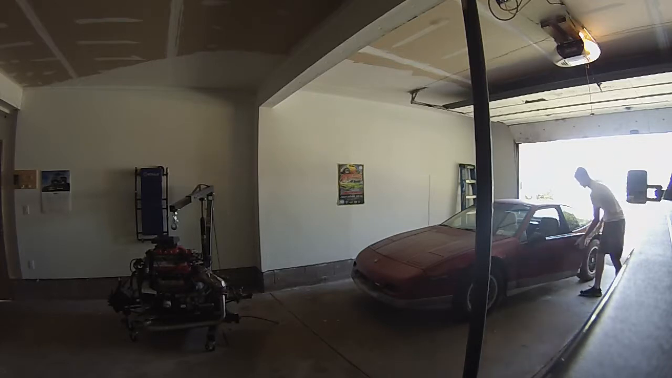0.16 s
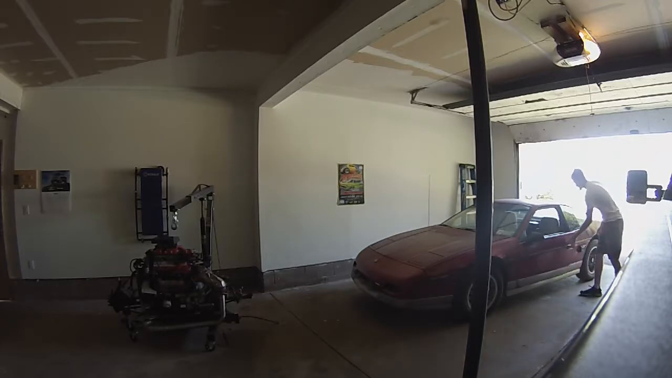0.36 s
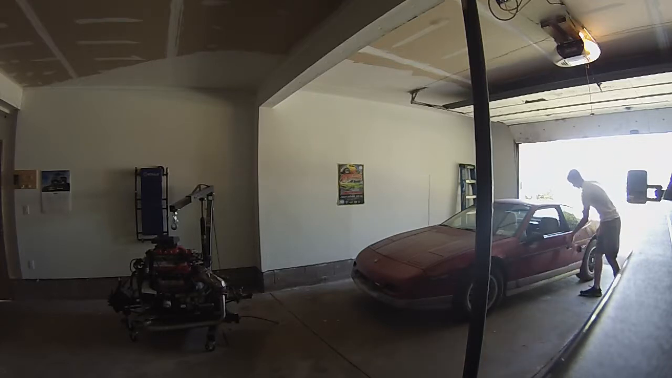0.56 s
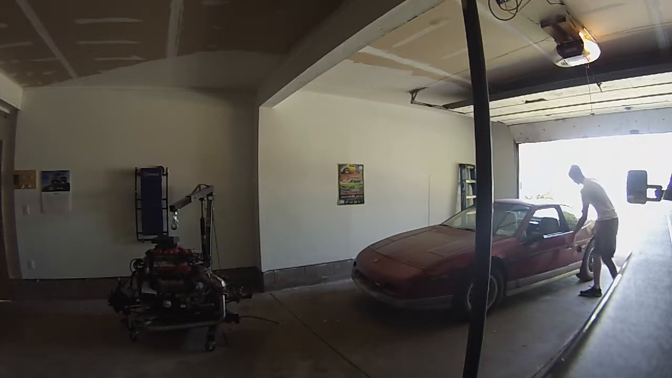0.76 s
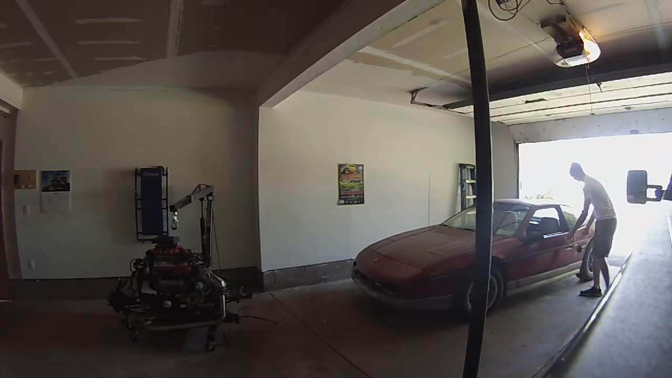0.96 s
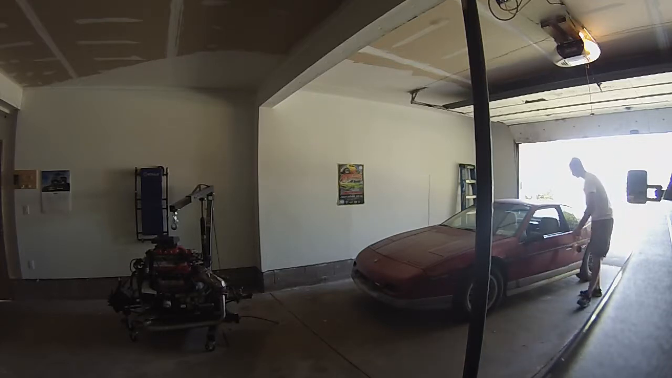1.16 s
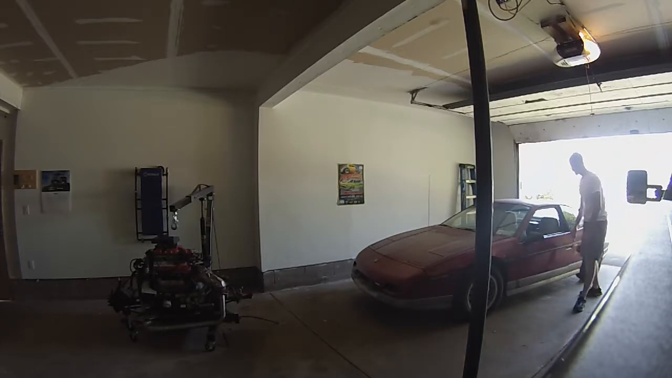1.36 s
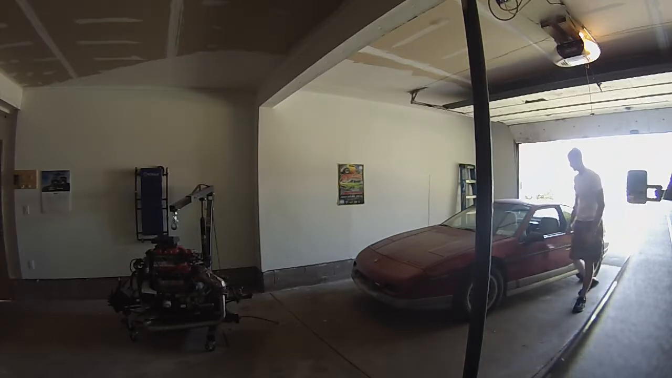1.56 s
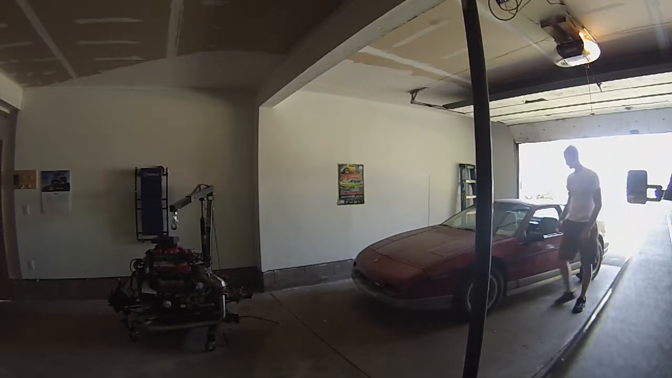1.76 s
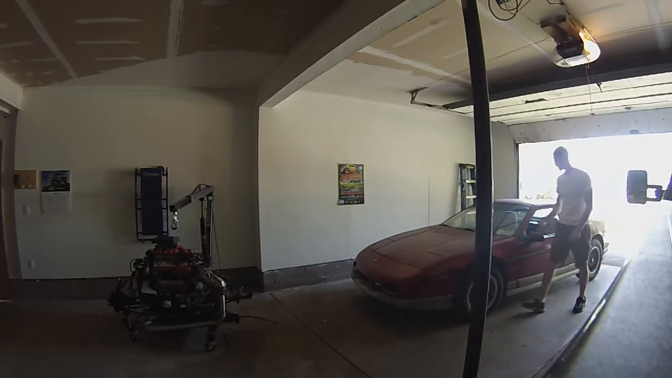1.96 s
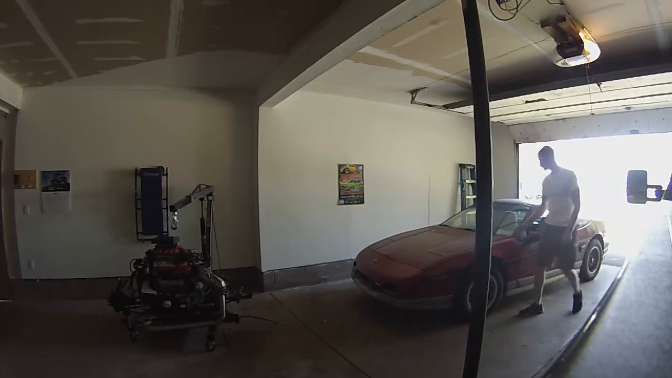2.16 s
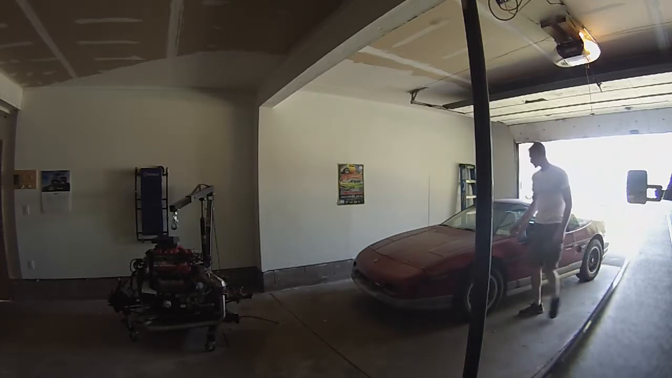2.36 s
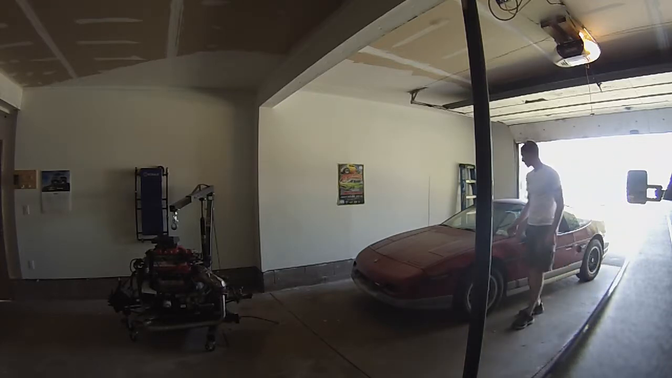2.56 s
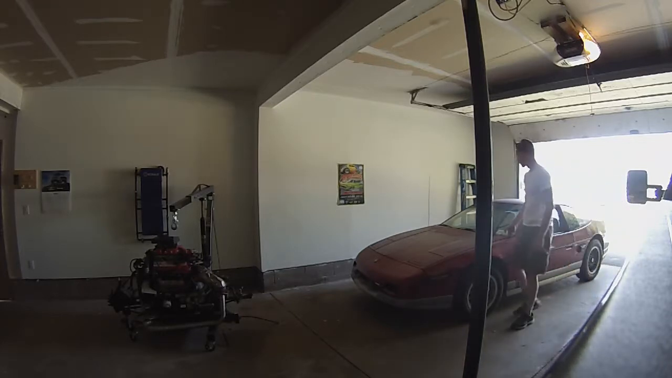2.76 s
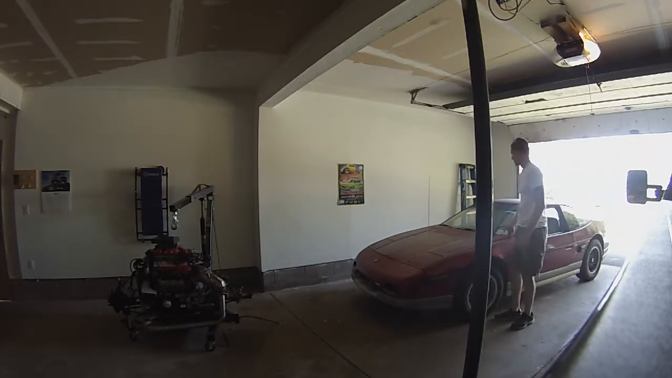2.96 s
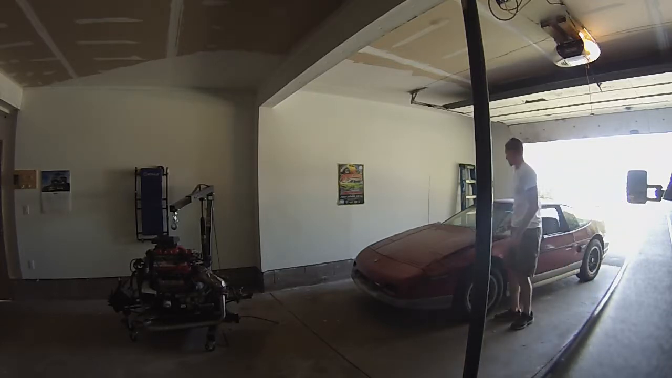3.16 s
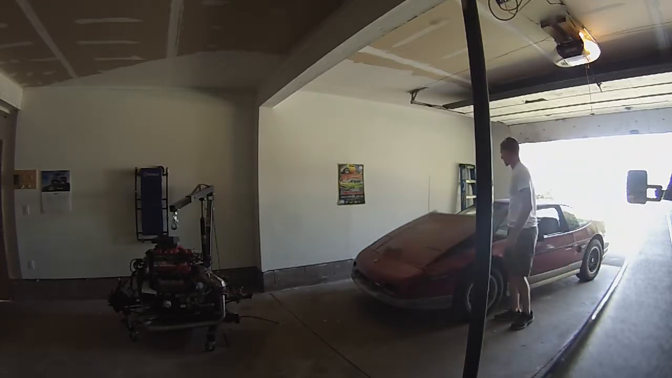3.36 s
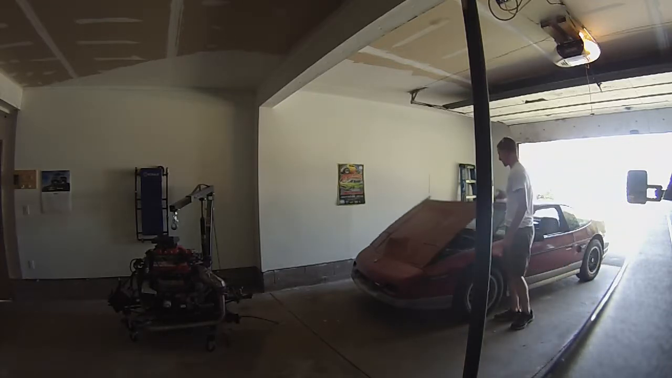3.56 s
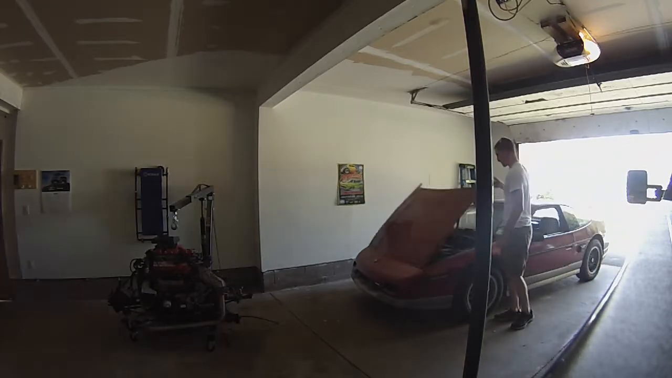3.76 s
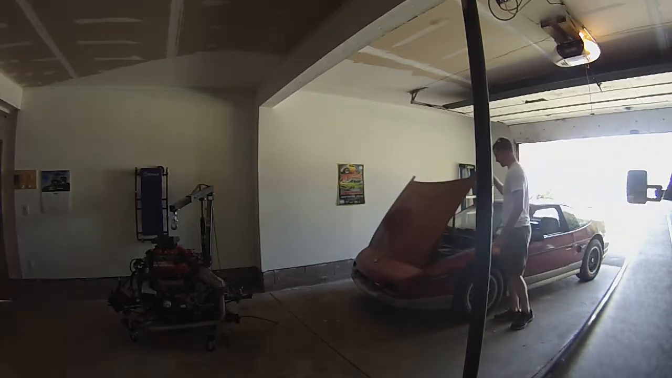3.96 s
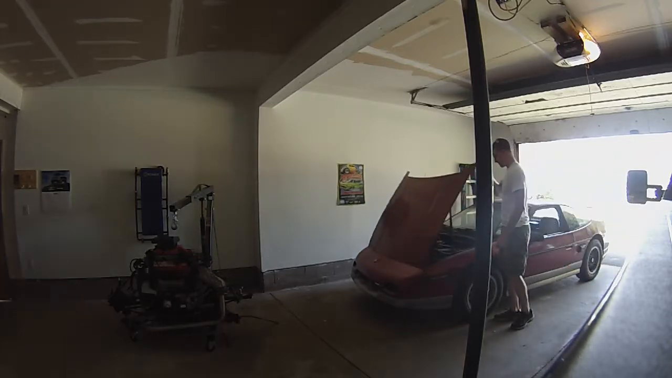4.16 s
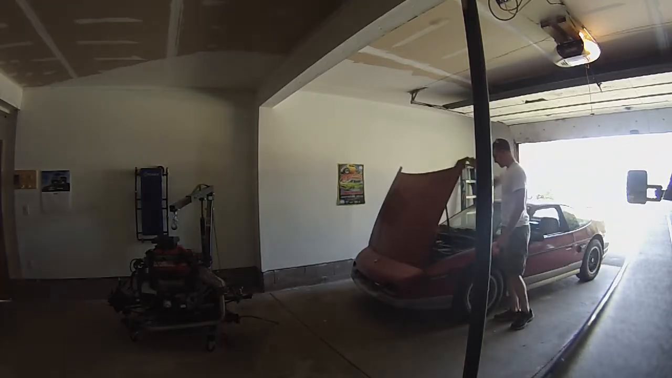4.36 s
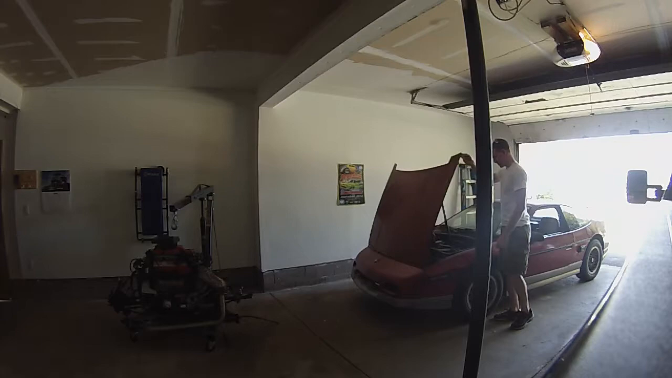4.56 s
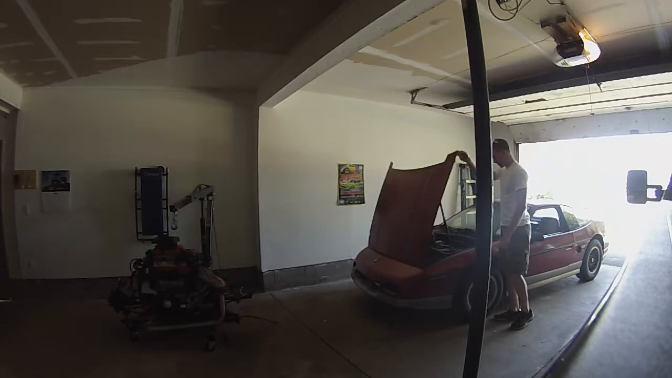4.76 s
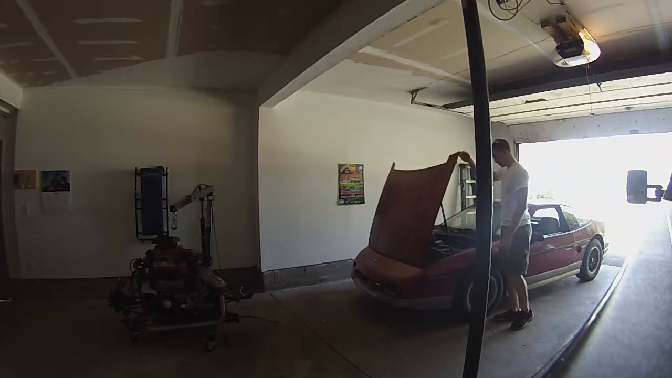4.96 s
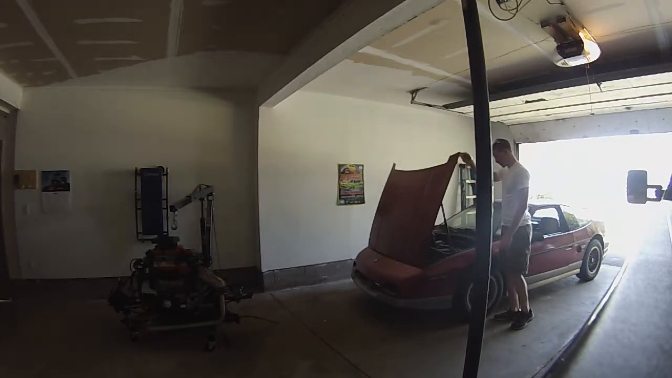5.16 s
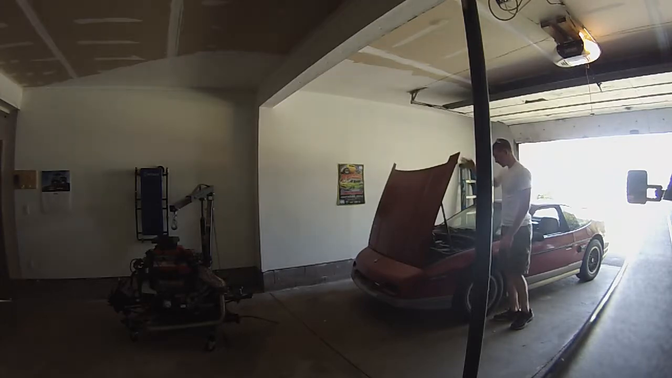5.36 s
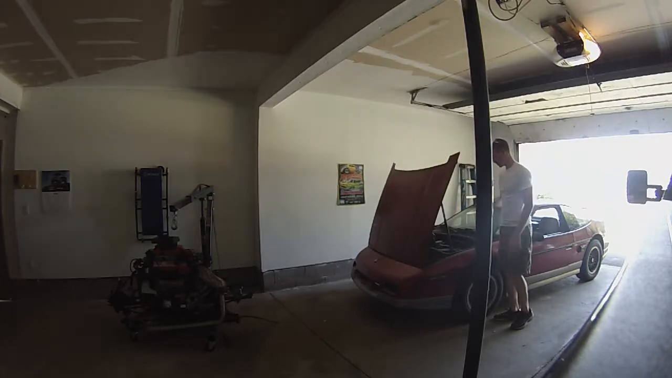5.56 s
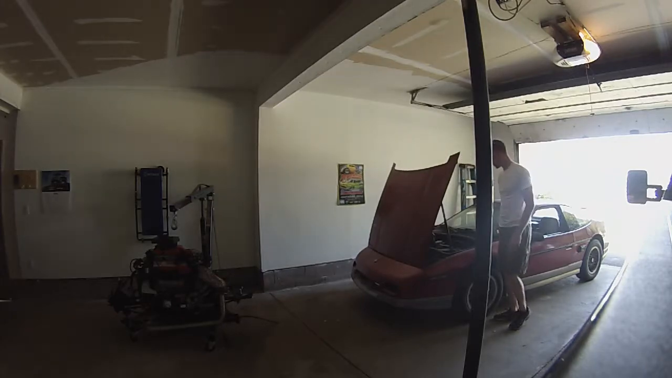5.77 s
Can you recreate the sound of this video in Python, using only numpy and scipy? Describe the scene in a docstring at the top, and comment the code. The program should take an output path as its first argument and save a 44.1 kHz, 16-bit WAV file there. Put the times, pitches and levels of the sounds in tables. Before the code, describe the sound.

A distant, nearly mono pickup in an echoing garage over quiet steady air with thin whines. A hinge knock and click lead to a solid car door slam with brief rattle. Quiet gritty steps follow under a passing low hum, then a loud hood pop. The prop slides and groans softly, ratchets past two bright metallic notches, and the panel settles with dull knocks.

```python
"""A car door knocks on its hinge in a bare, echoing garage, over steady air with thin whines, and is pushed
shut. A low outdoor hum swells once, shoes scuff on concrete, and the hood pops off its latch and is lifted. Its
stay slides and groans, clicks over two notches and takes the weight; small ticks and a brief scrape fall in
between. Blows are short pulses shaped like each object and echoed by the room; air, hum and rubbing are shaped
noise. Groans are wavering sines and booms are dying ones. Everything sits in the middle."""
import sys
import numpy as np
from scipy import signal
from scipy.fft import rfft, irfft
from scipy.io import wavfile
from scipy.ndimage import uniform_filter1d

SR = 44100
rng = np.random.default_rng(int(sys.argv[2]) if len(sys.argv) > 2 else 0)


def unload_wav(signal):
    """Save mono or channel-first audio to the path in sys.argv[1] as 16-bit WAV at rate SR, clipped to [-1, 1]."""
    wavfile.write(
        sys.argv[1],
        SR,
        np.round(np.clip(np.atleast_2d(signal).T, -1, 1) * 32767).astype(np.int16),
    )


N = 256919  # length of the scene in samples

# Blows on each object: [t/s, level/dB, brightness/dB per octave, fade time of the chatter/s (at least 0.001 is used)]
HINGE_BLOWS = [(0.0, -37, 1, 0.0075), (.088, -43.5, -1, 0.0086)]
DETENT_BLOWS = [(.152, -40, 0, 0.016)]
DOOR_BLOWS = [(.4335, -22, 0, 0.0029), (.441, -26.5, -0.7, 0.0034), (.464, -24, -2.5, 0.0047),
              (.482, -32.5, 3.5, 0.0065), (.502, -34, 2.9, .014), (.582, -33, -1.7, 0.0055),
              (.87, -48, -1.1, 0.021)]
# Grit cracking under a shoe, same columns: [t/s, level/dB, brightness/dB per octave, chatter/s]
GRIT_BLOWS = [(2.497, -47, 0, .001), (2.58, -48.5, 0.3, .002), (2.603, -52, -4.5, 0.00091)]
# Ticks and a brief scrape, hood latch, hood panel, notches of the stay, hood sinking back: [t/s, level/dB,
# brightness/dB per octave, # chatter/s]
TICK_BLOWS = [(1.862, -62.5, 6, .004), (3.997, -53, 4, 0.023), (5.486, -49.5, -2, 0.00091)]
LATCH_BLOWS = [(3.1348, -35.5, 1, 0.00092), (3.152, -33.5, 2, 0.0024), (3.164, -32, -2, .002)]
HOOD_BLOWS = [(3.236, -39, 2.5, 0.0032), (3.2445, -22, 1.1, 0.0022), (3.271, -25.5, -2, 0.013),
              (3.497, -48.5, 1.5, 0.005), (3.603, -45.5, -4, 0.0094)]
NOTCH_BLOWS = [(4.1048, -31, 0.53, 0.00097), (4.6925, -29, 0.0048, 0.0024)]
SETTLE_BLOWS = [(4.99, -42.5, 2, 0.0043), (5.036, -36, -0.4, 0.0085), (5.09, -43, -4, 0.023)]

# Tone color of each contact; only the shape counts, loudness is set elsewhere: [f/Hz, relative level/dB]
HINGE_COLOR = [(70, -18), (155, 3.5), (230, -7), (550, -2), (1100, -7), (1900, -12), (3100, -15),
               (4300, -25.5), (15000, -54.5)]
DETENT_COLOR = [(100, -2.5), (650, -1.5), (1100, 1), (1700, -9), (4300, -10.5), (8800, -26.5),
                (12000, -25.5), (15000, -34)]
DOOR_COLOR = [(12, -37), (28, 2), (90, -3), (160, -7.5), (400, -7.5), (650, -6.5), (930, -10),
              (1500, -12.5), (2800, -22), (4200, -28.5), (8000, -42), (15000, -55.5)]
HEEL_COLOR = [(200, -33), (400, -7.5), (550, 0), (850, -3), (1300, -5.5), (3000, -24), (9000, -43)]
SOLE_COLOR = [(300, -9.5), (1000, 0.5), (2200, 2), (3300, -0.5), (5000, -2), (7000, -8.5), (11000, -18),
              (15000, -25)]
TICK_COLOR = [(600, -54), (1100, -2.5), (1600, 1.5), (3000, -5.5), (7600, -16.5), (8800, -35), (15000, -40)]
LATCH_COLOR = [(90, -25), (180, -2), (330, -6.5), (620, -7.5), (1300, -9), (2600, -18), (3300, -26.5),
               (6000, -33.5), (15000, -62)]
HOOD_COLOR = [(20, -42), (50, -13), (85, -8.5), (130, -3.5), (240, -1.5), (380, -4), (540, -1),
              (1000, -9.5), (2300, -25.5), (3300, -21.5), (4000, -29.5), (15000, -52)]
SLIDE_COLOR = [(50, -18.5), (130, 1), (260, 1), (380, 0.5), (560, -1.5), (800, -10), (1500, -21.5),
               (4500, -29), (15000, -51)]
FIRST_NOTCH_COLOR = [(130, -23.5), (420, -5.5), (540, -6.5), (750, -5), (1350, -6.5), (2560, -20),
                     (3400, -16.5), (6000, -26.5), (15000, -35)]
LAST_NOTCH_COLOR = [(120, -31), (350, -7.5), (490, -15), (620, -7), (1500, -7.5), (2170, -23),
                    (3000, -18.5), (4900, -19), (15000, -34.5)]
SETTLE_COLOR = [(90, -12.5), (190, 2), (300, -5), (600, -0.5), (950, -3.5), (1500, -13), (3200, -23.5),
                (4500, -31.5), (10000, -50)]

# Resonances of each struck part: [f/Hz, width/Hz, lift/dB]
DOOR_MODES = [(189, 12, 4.5), (392, 6.8, 6.5), (659, 16, 6.5), (810, 16, 4.5), (1540, 14, 4.5),
              (1740, 14, 4.5)]
GRIT_MODES = [(1490, 120, 9.7), (2160, 60, 4.9), (3190, 70, 11.4)]
TICK_MODES = [(1092, 20, 12), (1520, 43, 9.3), (3720, 110, 7.4), (7770, 81, 7.9)]
LATCH_MODES = [(449, 36, 11.3), (972, 15, 11)]
HOOD_MODES = [(181, 5.2, 2.7), (481, 20, 5), (586, 12, 5.6), (809, 27, 5.1), (1055, 22, 6.1)]
FIRST_NOTCH_MODES = [(715, 14, 9.6), (899, 28, 8), (1280, 82, 7.1), (3236, 30, 12.3), (3610, 73, 7.5),
                     (4270, 40, 8.5), (4950, 76, 6.7), (8000, 160, 6.5)]
LAST_NOTCH_MODES = [(360, 10, 6.6), (610, 14, 7), (822, 20, 7.7), (950, 13, 7.9), (1052, 25, 9.2),
                    (2705, 47, 10.4), (3450, 30, 11.5)]
SETTLE_MODES = [(477, 7.6, 6), (605, 11, 11), (948, 20, 11)]

# Lowest modes of the cabin air, and of the whole hood wobbling on its stay: [f/Hz, level/dB, time to fall 60 dB/s]
CABIN_MODES = [(30.8, -32, 1.52), (50.4, -34, 0.87), (81.8, -12.5, 0.33), (99, -33, 0.25), (130, -46, 0.16)]
FLEX_MODES = [(33.6, -48, 1.0), (58, -61, .6)]

# Tone color of the steady air: [f/Hz, relative level/dB]
AIR_COLOR = [(12, -57), (20, -8), (87, -4.5), (128, -11), (169, -9), (357, -14.5), (398, -16.5),
             (1050, -14), (2100, -23.5), (6720, -34), (15000, -48)]
# Thin whines in the air: [f/Hz, width/Hz, lift/dB]
WHINES = [(4200, 400, 4.5), (6640, 170, 10)]
# Echo of the garage: [f/Hz, time to fall 60 dB/s]
GARAGE_DECAY = [(40, 0.51), (90, .58), (170, 0.83), (400, 0.74), (1000, 0.67), (2500, 0.64), (5000, 0.68),
                (8000, 0.65), (14000, 0.42)]
# Very weak trace by which the two channels differ: [f/Hz, level against the middle/dB]
TRACE = [(100, -59), (500, -46), (2000, -29.5), (12000, -21)]

# Footfalls: [t/s, level of the first thud/dB, level of the first grit/dB, brightness of the grit/dB per octave,
# roll from heel to toe/s, fade time of the scuff/s (at least 0.001 is used),
# shift from thud to grit at each contact/dB]
STEPS = [(1.172, -49, -67.5, 3, .1, 0.042, 5.5), (1.988, -70, -51, 2, .034, 0.003, -1),
         (2.492, -62, -48, -1.5, .1, 0.0054, -1.2), (2.973, -61, -64, -0.5, 0.026, 0.0088, -1)]
# Pushes that lift the hood: [t/s, length/s, rubbing level/dB, its brightness/dB per octave, groan level/dB,
# groan f/Hz]
PUSHES = [(3.647, 0.23, -45, 1, -51, 248), (3.964, 0.038, -47, 1.5, -70, 252),
          (4.25, 0.33, -52.5, 2, -54, 317)]

SEAL_S, FLEX_S = .4645, 5.07  # start of the cabin boom and of the hood's wobble
AIR_DB = -54.5
HUM_S, HUM_LENGTH_S, HUM_DB = 1.38, 0.33, -58
HUM_ATTACK_S, HUM_RELEASE_S = 0.056, 0.33
ROLL_DB = -0.5  # each contact of a footfall against the one before, ahead of the shift
HEEL_TILT_DB = 0  # per octave
PUSH_ATTACK_S, PUSH_RELEASE_S = 0.033, 0.12
PUSH_SURGE_DB = 2.5  # how unevenly the hand lifts
EDGE_HZ = 15400


def amp(db):
    """Turns decibels into gain."""
    return 10 ** (np.asarray(db) / 20)


def unit(x):
    """Scales to an energy of one."""
    return x / np.sqrt(np.sum(x ** 2) + 1e-20)


def evened(x):
    """Scales to an rms (average strength) of one."""
    return unit(x) * np.sqrt(len(x))


def read(points, hz):
    """Reads a table between its points, on a log-frequency axis."""
    f, value = np.transpose(points)
    return np.interp(np.log(hz + 1), np.log(f + 1), value)


def add(mix, s, sound):
    """Mixes a sound in at a time in seconds."""
    part = mix[max(round(s * SR), 0):][:len(sound)]
    part += sound[:len(part)]


def noise(db_at):
    """Steady noise whose spectrum follows a function of frequency."""
    spectrum = rfft(rng.standard_normal(N))
    return evened(irfft(spectrum * amp(db_at(np.fft.rfftfreq(N, 1 / SR))), N))


def swell(s, length_s, attack_s, release_s):
    """Gain over time: a straight rise, a hold, and an exponential release once the length is over."""
    t = np.arange(N) / SR - s
    rise = np.clip(t / attack_s, 0, 1)
    return rise * np.exp(-np.maximum(t - length_s, 0) / release_s)


def click(color, tilt_db, modes=(), size=16384):
    """The most compact causal pulse with this color and these resonances, tilted about 1 kHz."""
    hz = abs(np.fft.fftfreq(size, 1 / SR))
    db = read(color, hz) + tilt_db * np.log2(np.maximum(hz, 60) / 1000)
    lift = 1  # resonances add as energy
    for at, width, up_db in modes:
        lift = lift + (amp(max(up_db, 0)) ** 2 - 1) / (1 + (2 * (hz - at) / width) ** 2)
    log_gain = np.log(amp(np.maximum(db, db.max() - 100)) * np.sqrt(lift))
    # the Hilbert transform gives the phase that packs the energy as early as possible
    pulse = np.fft.ifft(np.exp(np.conj(signal.hilbert(log_gain)))).real
    return unit(pulse[:size // 2])


def garage(near_db=-14, build_s=.006, near_s=.025, direct_db=-25, early_db=-11, early_s=.022,
           split_hz=2500, size=256, count=14):
    """One path across the room: a weak direct sound, first wall echoes, then a dense tail that dies by band."""
    hz, frames, z = signal.stft(rng.standard_normal(SR), SR, nperseg=size)
    t = np.arange(SR) / SR
    decay = amp(-60 * frames / read(GARAGE_DECAY, hz)[:, None])
    tail = signal.istft(z * decay, SR, nperseg=size)[1][:SR]
    tail = tail * (1 + amp(near_db) * np.exp(-t / near_s))  # the car's body and the floor scatter first
    low = irfft(rfft(tail) / (1 + (np.fft.rfftfreq(SR, 1 / SR) / split_hz) ** 2), SR)
    path = unit(tail - low * np.exp(-t / build_s))  # the treble is there at once, the rest builds up
    when, strength = rng.random(count), rng.standard_normal(count)
    path[((build_s + when * early_s) * SR).astype(int)] += amp(early_db) * unit(strength)
    path[0] += amp(direct_db)
    return path


def blows(rows, color, modes=(), near_db=-12, build_s=.006, chatter_db=0, chatter_per_s=900):
    """Each blow is a first contact and a dying chatter of random ones; they ring the object and the room."""
    out, t = np.zeros(N), np.arange(SR) / SR
    for s, db, tilt_db, chatter_s in rows:
        chatter = rng.standard_normal(SR) * (rng.random(SR) < chatter_per_s / SR)
        force = amp(chatter_db) * unit(chatter * np.exp(-t / max(chatter_s, 1e-3)))
        force[0] += 1  # the first contact
        response = signal.fftconvolve(click(color, tilt_db, modes), garage(near_db, build_s))[:SR]
        heard = signal.fftconvolve(force, response)[:SR]
        # the level counts the blow's energy as if spread over a tenth of a second
        add(out, s, amp(db) * unit(heard) * np.sqrt(SR / 10))
    return out


def boom(s, modes, push_s):
    """A soft push sets the lowest modes of a large body swinging as a sum of dying sines."""
    out, t = np.zeros(N), np.arange(SR) / SR
    ring = sum(amp(db - 60 * t / t60) * np.sin(2 * np.pi * hz * t) for hz, db, t60 in modes)
    add(out, s, ring * (1 - np.exp(-t / push_s)))
    return out


def door_hinge():
    """The hinge knocks and then clicks past its detent, the catch that holds a door open."""
    knocks = blows(HINGE_BLOWS, HINGE_COLOR, chatter_db=-8.5)
    detent = blows(DETENT_BLOWS, DETENT_COLOR, chatter_db=-14)
    return knocks + detent


def outdoors(hum_hz=86):
    """Steady air noise with thin whines, and a narrow, wavering band of low noise that swells once as a hum."""
    def air_db(f):
        whines = sum(db / (1 + (2 * (f - hz) / width) ** 4) for hz, width, db in WHINES)
        return read(AIR_COLOR, f) + whines

    air = noise(air_db)
    hum = noise(lambda f: -20 * np.log10(1 + ((f - hum_hz) / 4) ** 2))
    hum_gain = amp(HUM_DB) * swell(HUM_S, HUM_LENGTH_S, HUM_ATTACK_S, HUM_RELEASE_S)
    return amp(AIR_DB) * air + hum_gain * hum


def door_slam():
    """The latch strikes and the door rings, and the seal squeezes the cabin air into a boom."""
    slam = blows(DOOR_BLOWS, DOOR_COLOR, DOOR_MODES, chatter_db=-5.5)
    return slam + boom(SEAL_S, CABIN_MODES, push_s=0.005)


def steps(count=3):
    """Each shoe rolls over heel, ball and toe; every contact is a dull thud and a gritty scuff on concrete."""
    thuds, scuffs = [], []
    for s, thud_db, grit_db, tilt_db, roll_s, scuff_s, shift_db in STEPS:
        for k, at in enumerate(np.linspace(s, s + roll_s, count)):
            thuds.append((at, thud_db + k * (ROLL_DB - shift_db / 2), HEEL_TILT_DB, scuff_s))
            scuffs.append((at, grit_db + k * (ROLL_DB + shift_db), tilt_db, scuff_s))
    cracks = blows(GRIT_BLOWS, SOLE_COLOR, GRIT_MODES, near_db=-2.5, chatter_db=-3)
    heels = blows(thuds, HEEL_COLOR, chatter_db=23)
    soles = blows(scuffs, SOLE_COLOR, chatter_db=-4.0, chatter_per_s=870)
    return cracks + heels + soles


def ticks():
    """Small bright ticks and one brief, softer scrape, each ringing a few high resonances."""
    return blows(TICK_BLOWS, TICK_COLOR, TICK_MODES, chatter_db=-18)


def hood_release():
    """The latch lets go with a few clicks and the panel jumps free, ringing at its own resonances."""
    latch = blows(LATCH_BLOWS, LATCH_COLOR, LATCH_MODES, near_db=0, build_s=.001, chatter_db=-16)
    panel = blows(HOOD_BLOWS, HOOD_COLOR, HOOD_MODES, build_s=0.00097, chatter_db=-8)
    return latch + panel


def stay_slide(slips_per_s=250):
    """With each push the steel stay sticks and slips in random jerks, and groans as a wavering sine."""
    waver = evened(uniform_filter1d(rng.standard_normal(N), size=900))
    surges = amp(PUSH_SURGE_DB * evened(uniform_filter1d(rng.standard_normal(N), size=2400)))
    slips = surges * rng.standard_normal(N) * (rng.random(N) < slips_per_s / SR)
    slips = signal.fftconvolve(slips, garage())[:N]
    sliding = np.zeros(N)
    for s, length_s, rub_db, tilt_db, groan_db, pitch_hz in PUSHES:
        rub = evened(signal.fftconvolve(slips, click(SLIDE_COLOR, tilt_db))[:N])
        groan_hz = pitch_hz * (1 + 0.033 * waver)
        groan = evened(np.sin(2 * np.pi * np.cumsum(groan_hz) / SR))
        push = swell(s, length_s, PUSH_ATTACK_S, PUSH_RELEASE_S)
        sliding += push * (amp(rub_db) * rub + amp(groan_db) * groan)
    return sliding


def stay_notches():
    """The stay clicks over two notches; longer at each one, it rings differently there."""
    first = blows(NOTCH_BLOWS[:1], FIRST_NOTCH_COLOR, FIRST_NOTCH_MODES,
                  near_db=-10.5, build_s=0.014, chatter_db=-18.0)
    last = blows(NOTCH_BLOWS[1:], LAST_NOTCH_COLOR, LAST_NOTCH_MODES, near_db=-16, chatter_db=-29)
    return first + last


def hood_settle():
    """The hood sinks back on its stay with a few knocks, and its whole panel wobbles at very low modes."""
    knocks = blows(SETTLE_BLOWS, SETTLE_COLOR, SETTLE_MODES, build_s=.012, chatter_db=-4)
    return knocks + boom(FLEX_S, FLEX_MODES, push_s=0.04)


def scene(size=512):
    """Everything sits in the middle; a very weak scrambled trace is added to one channel, taken from the other."""
    mid = door_hinge() + outdoors() + door_slam() + steps() + ticks()
    mid = mid + hood_release() + stay_slide() + stay_notches() + hood_settle()
    scrambled = signal.oaconvolve(mid, unit(rng.standard_normal(size)))[:N]
    trace = irfft(rfft(scrambled) * amp(read(TRACE, np.fft.rfftfreq(N, 1 / SR))), N)
    return np.array([mid + trace, mid - trace])


def record(dry):
    """Cuts the highest treble with a steep low-pass filter."""
    low_pass = signal.firwin(511, EDGE_HZ, window=("kaiser", 9), fs=SR)
    return signal.oaconvolve(dry, low_pass[None], "same")


dry = scene()
out = record(dry)
unload_wav(out)
```